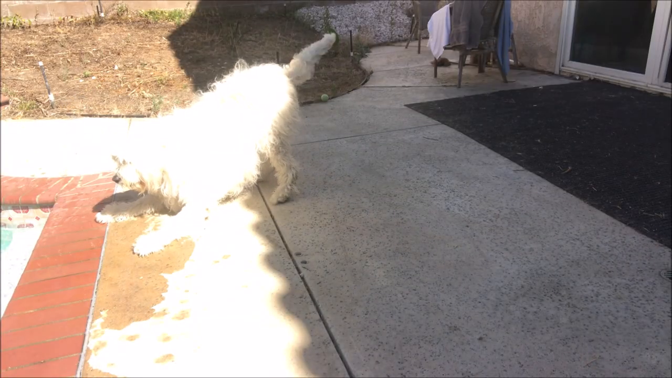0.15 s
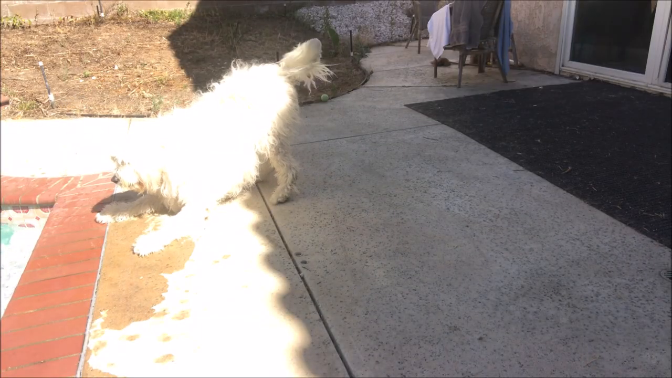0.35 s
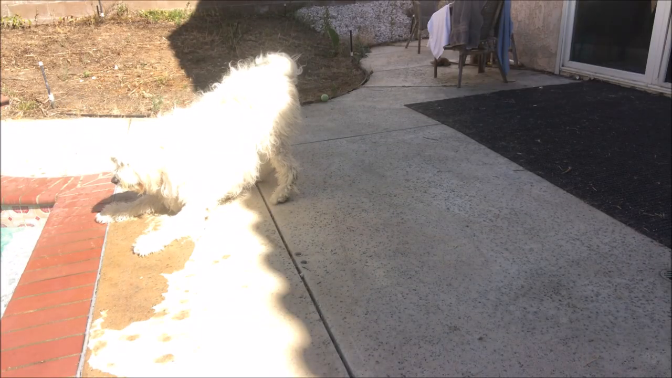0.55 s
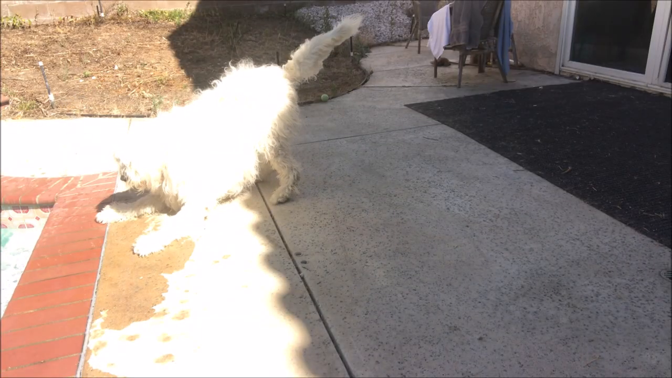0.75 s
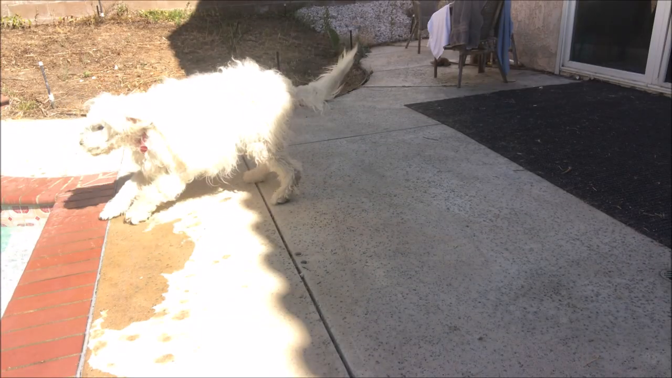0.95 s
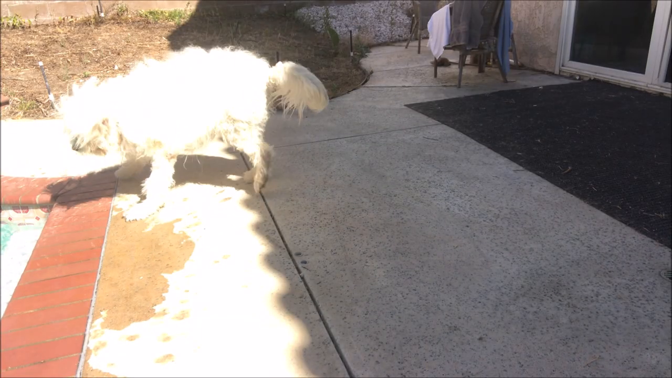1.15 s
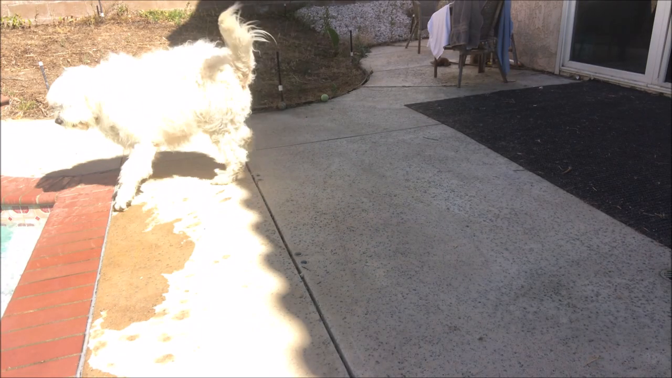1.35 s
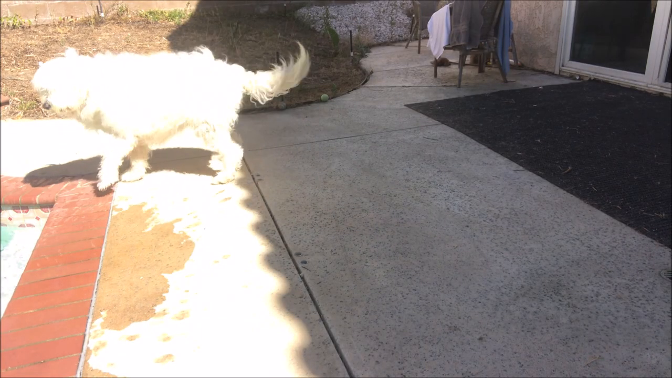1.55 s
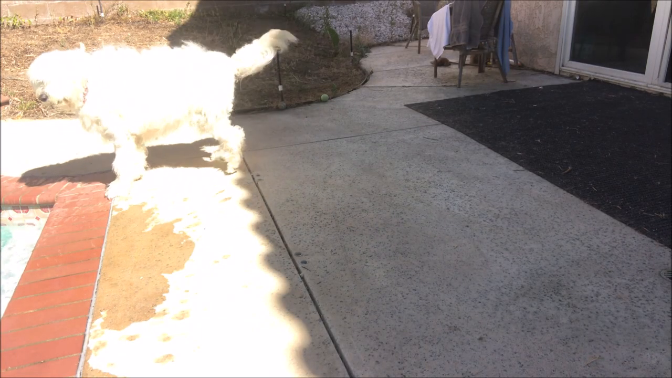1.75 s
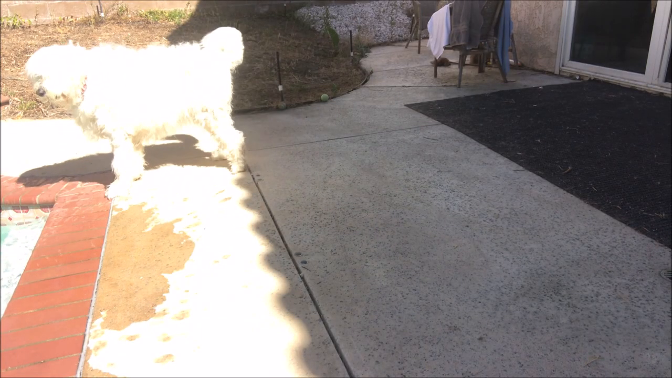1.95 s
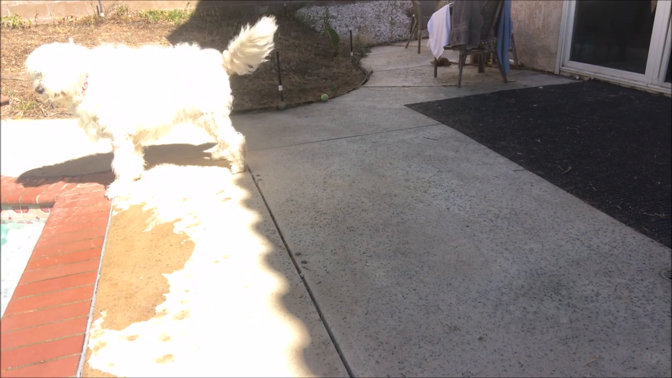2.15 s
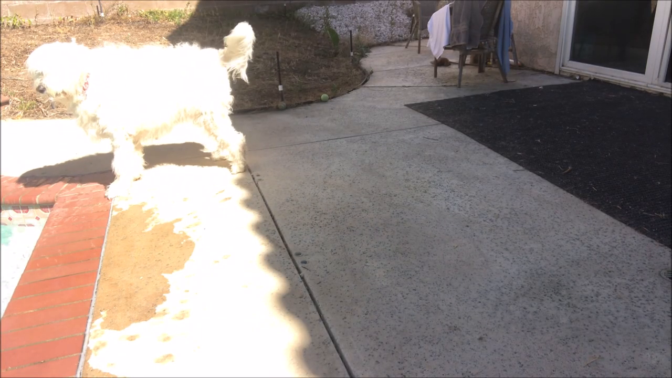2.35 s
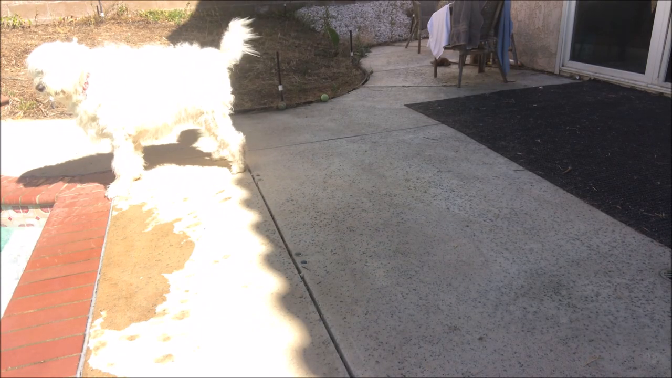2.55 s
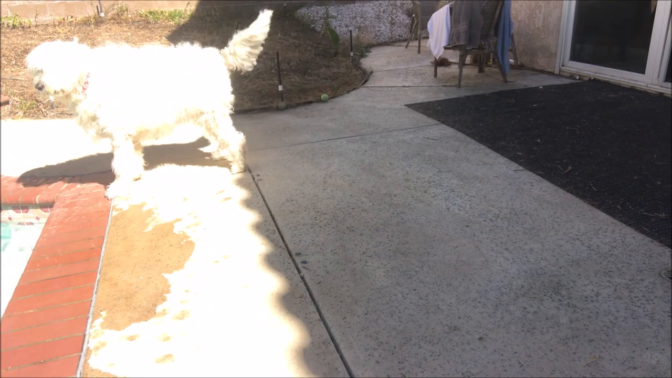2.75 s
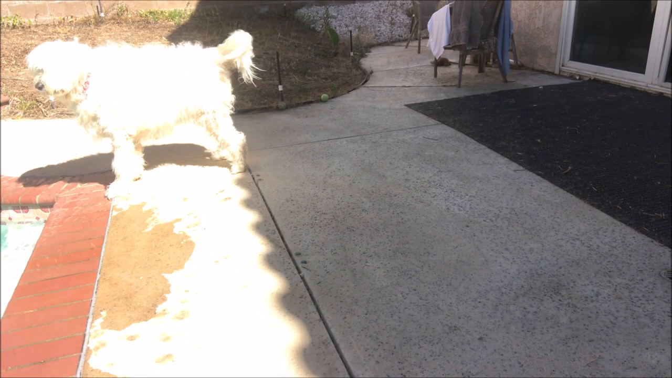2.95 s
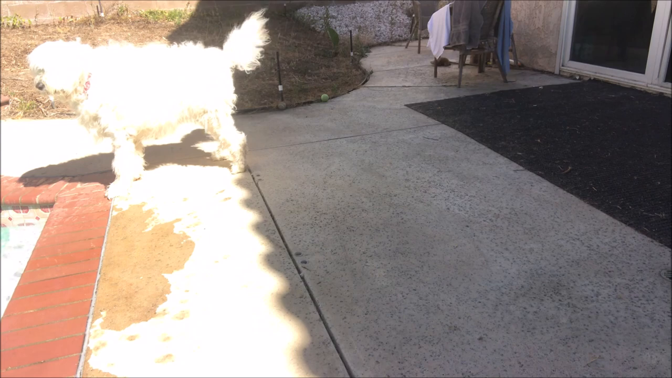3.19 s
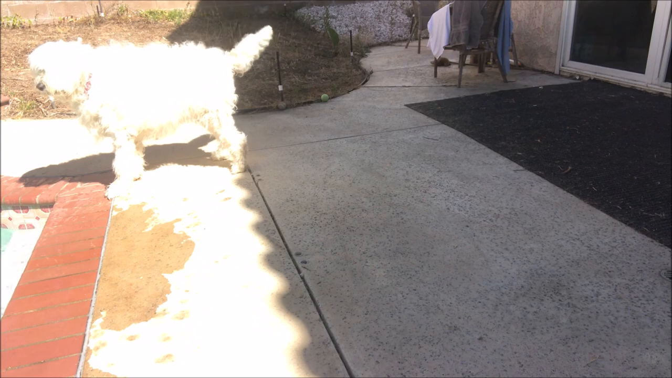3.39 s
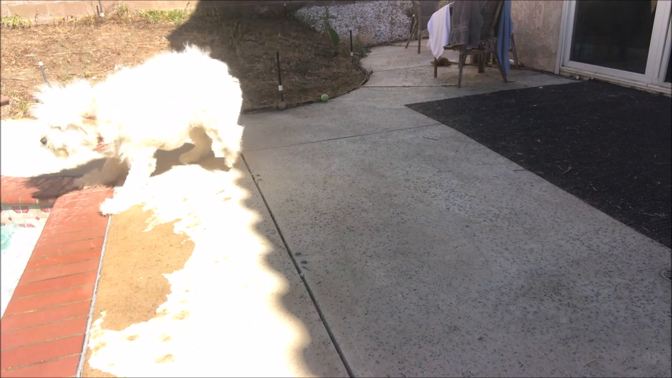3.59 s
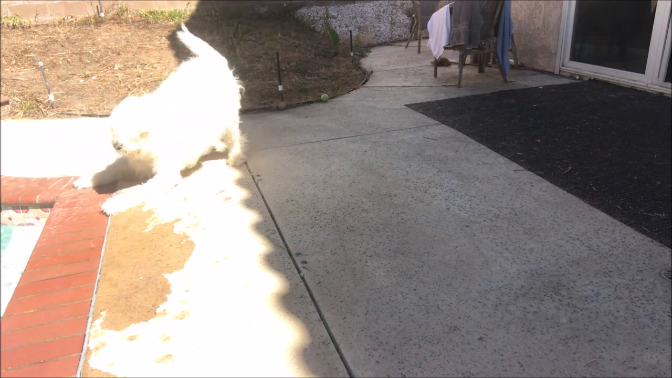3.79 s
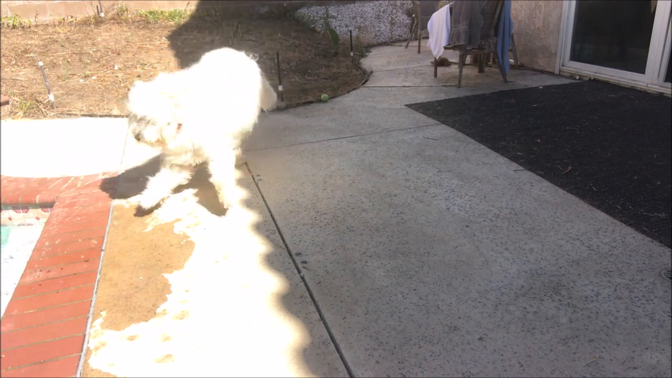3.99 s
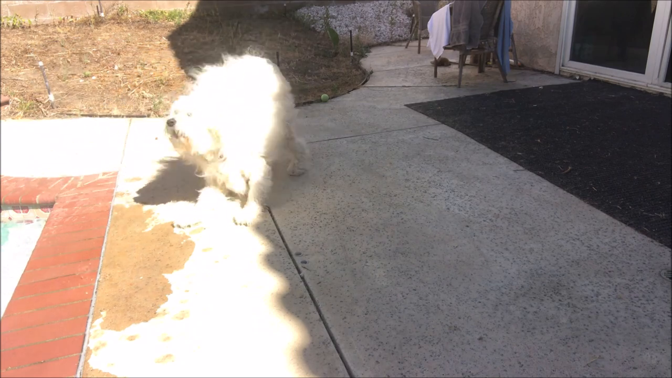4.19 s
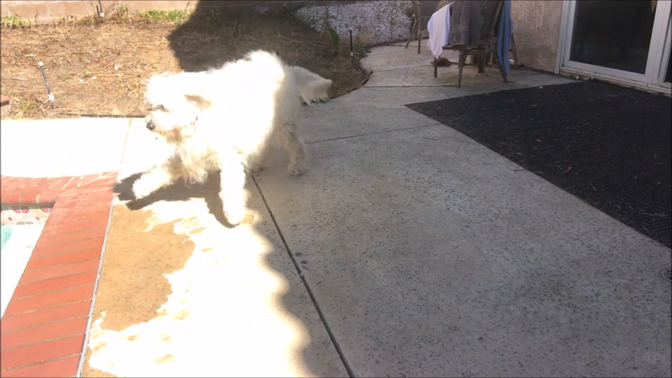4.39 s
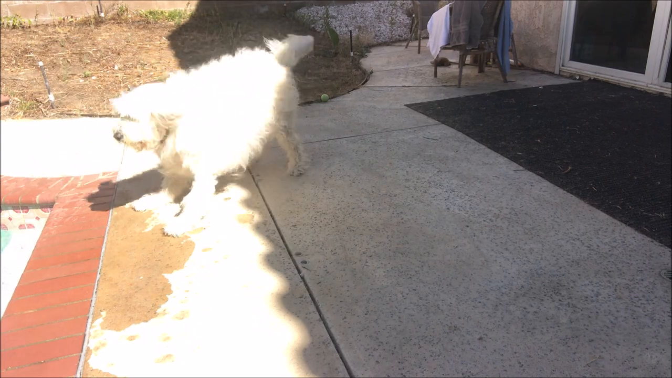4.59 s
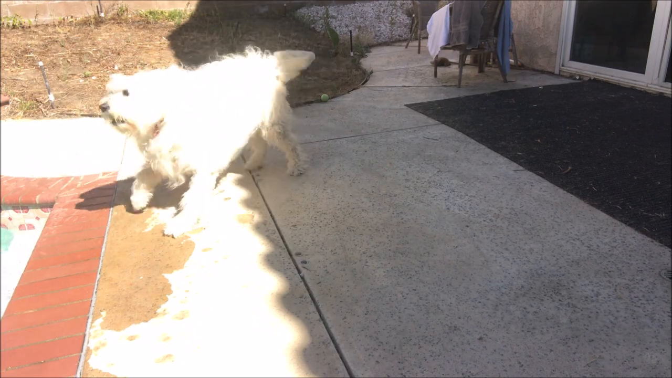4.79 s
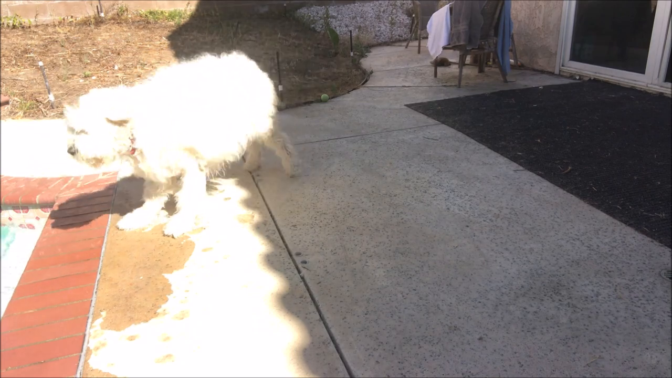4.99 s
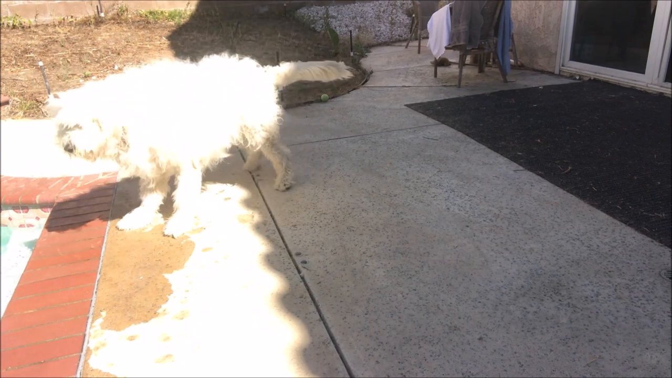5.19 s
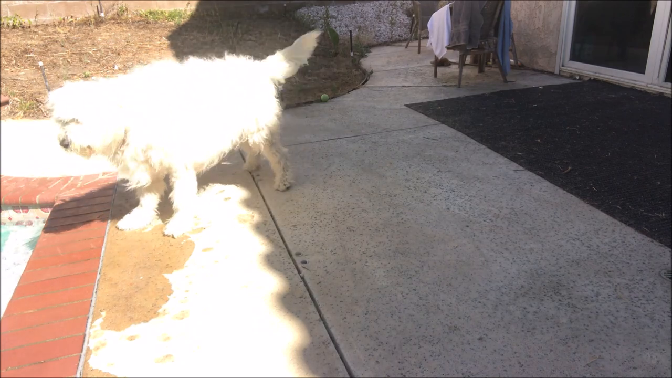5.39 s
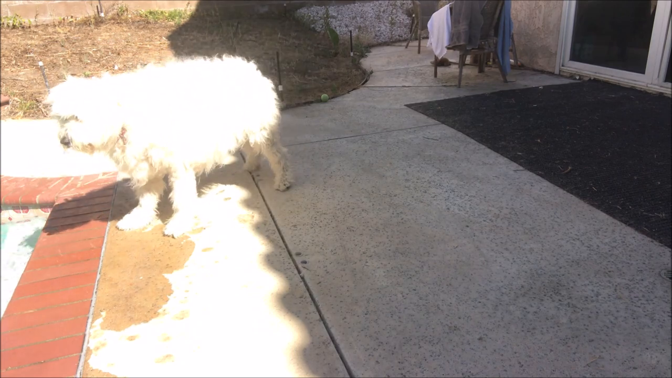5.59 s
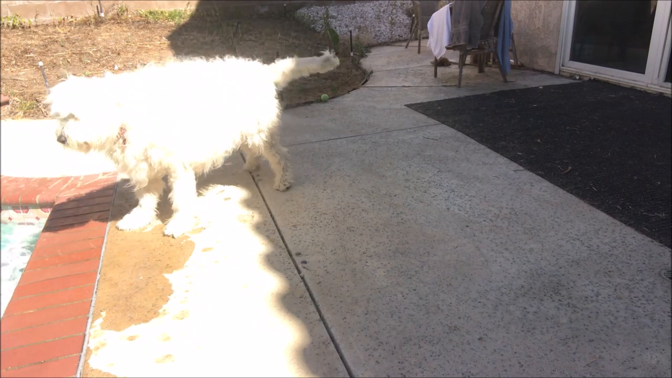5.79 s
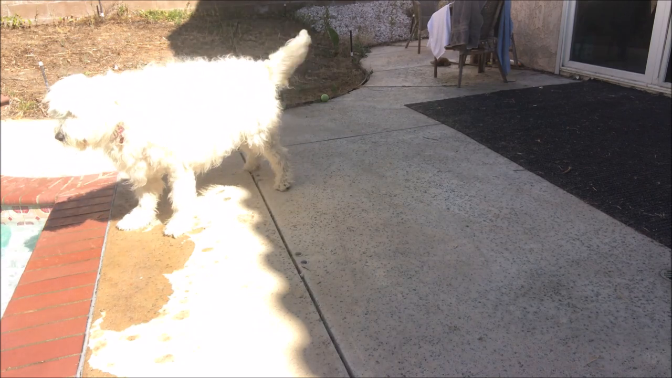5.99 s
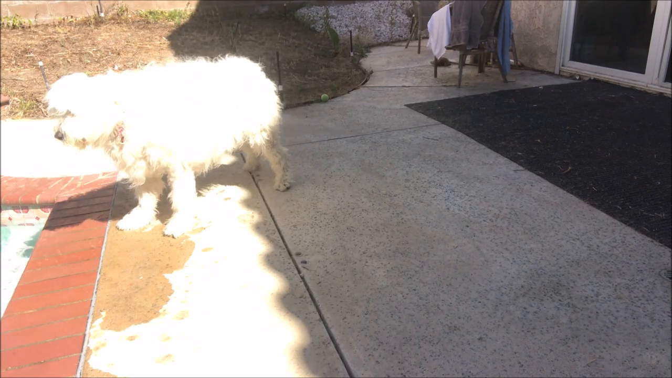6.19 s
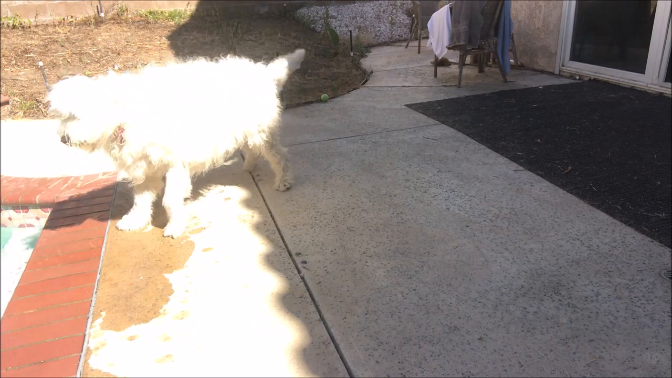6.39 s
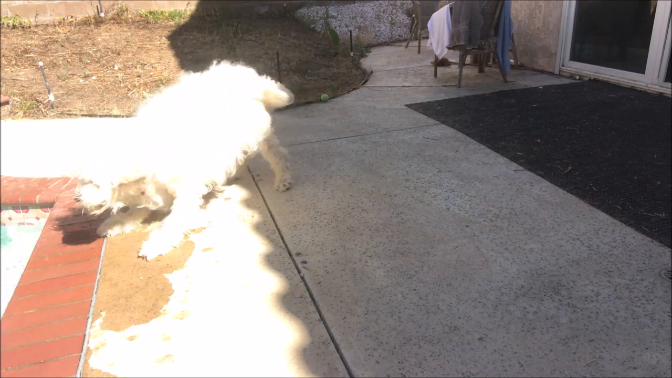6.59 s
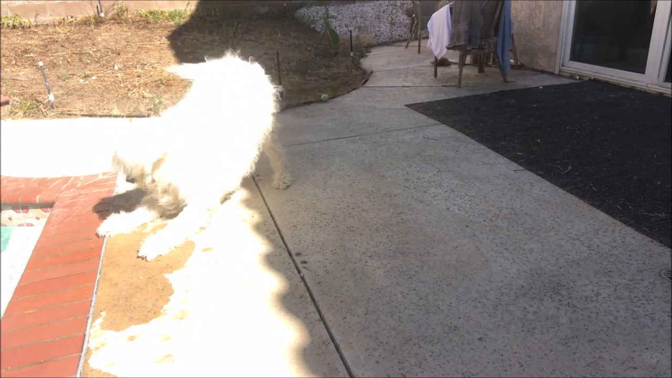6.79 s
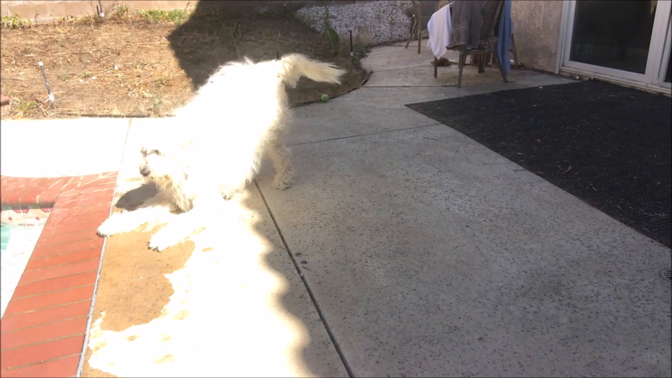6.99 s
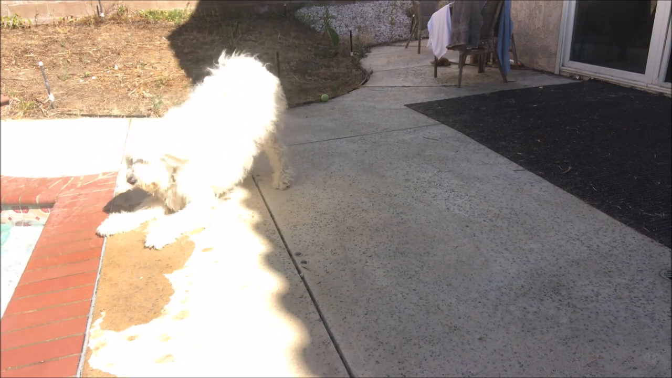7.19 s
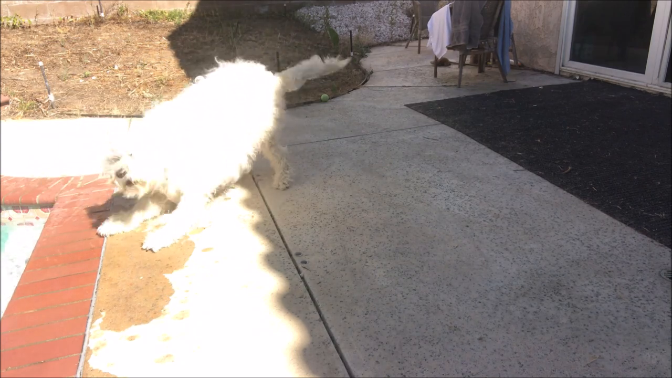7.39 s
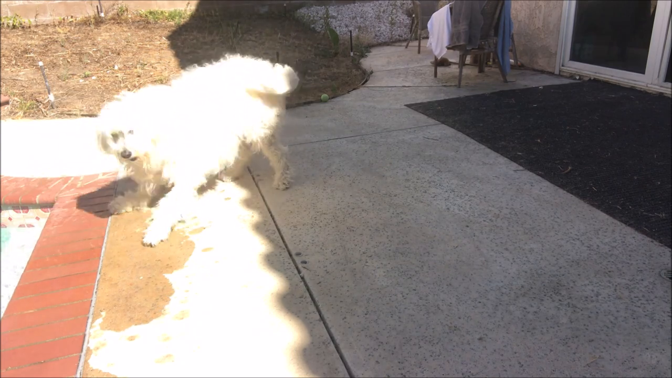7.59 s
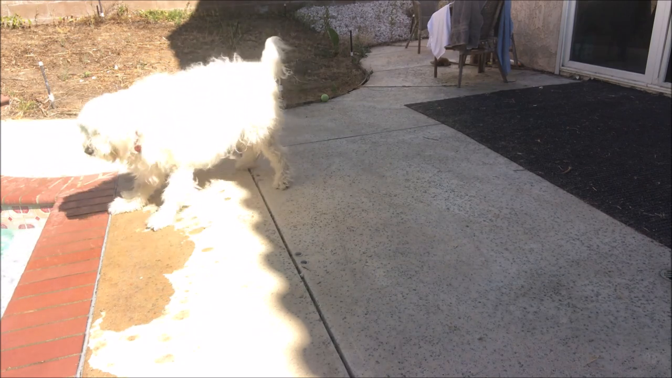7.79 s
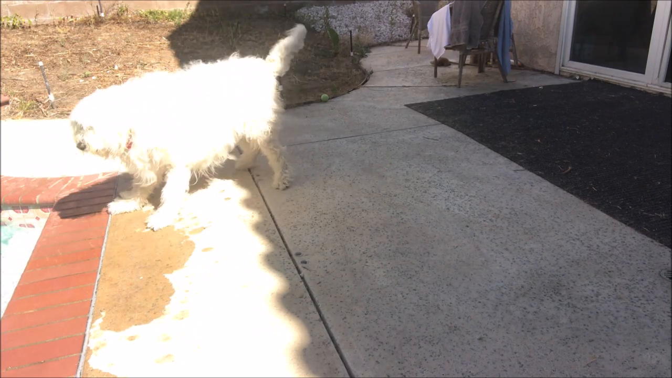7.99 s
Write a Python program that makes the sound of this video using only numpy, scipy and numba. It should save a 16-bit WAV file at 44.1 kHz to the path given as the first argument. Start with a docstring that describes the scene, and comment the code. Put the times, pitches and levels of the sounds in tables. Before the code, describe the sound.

Pool water laps and drips softly in a yard, over faint neighbourhood noise. A paw scrapes lightly at 0.4 seconds. At about 1 second a large dog gives one loud, rough bark close to the microphone, followed by a quiet, fluttering snort from 1.5 to 1.8 seconds. After a lull, three barks come at 3.6, 4.3 and 4.9 seconds, each breaking briefly into a yelp. The water sloshes hardest around 4 to 5 seconds, with a sharp drip at 4.7, then settles. Two more yelping barks land at 6.6 and 7.4 seconds, with a soft, breathy snarl between them from 6.9 to 7.3. The water stirs again until the end at about 8 seconds. Claws tick faintly on concrete here and there. The barks are short and much louder than everything else, each with a quick, bright echo from the house wall and a faint tail.

```python
"""A large dog barks six times, close by, with a snort and a snarl in between, beside a lapping pool.
Each bark is the rough buzz of vocal folds ringing in a closing mouth; five break into a clear yelp.
The snort and the snarl are fluttering puffs of breath. The water is tiny ringing bubbles, spray and drips.
Claws tick and a paw scrapes. The house wall and the yard echo, over faint neighbourhood noise."""
import sys
import numpy as np
from scipy import signal
from scipy.fft import rfft, irfft, next_fast_len
from scipy.io import wavfile
from scipy.ndimage import uniform_filter1d, map_coordinates
from numba import njit

SR = 44100
rng = np.random.default_rng(int(sys.argv[2]) if len(sys.argv) > 2 else 0)


def materialize(psi):
    """Save the field psi as 16-bit PCM at rate SR to the path in sys.argv[1].

    A 1-D psi becomes a single channel; in a 2-D psi each row is a channel.
    """
    bounded = np.clip(np.atleast_2d(psi).T, -1, 1)
    quanta = np.round(bounded * 32767).astype(np.int16)
    wavfile.write(sys.argv[1], SR, quanta)


N = 354999


def barks():
    """Six barks. Returns the sound heard directly and the sound sent towards the house wall."""
    # Each row: start, then rise time, hold time, time of the top pitch and time the mouth is half shut,
    # all in seconds; top pitch in Hz; roughness from 0 to 1; open-mouth resonances 1 and 2 in Hz;
    # relative levels in dB of woof, chest, resonances 1 to 3 and rasp; open-mouth resonance 3 in Hz;
    # pitch scoop in seconds; clearing at the top pitch from 0 to 1; grumble and wall echo levels in dB.
    bark_rows = [(.974, .038, 0.098, .1, 0.052, 386.6, 0.8, 940, 1394, -15.5, -18, -9.5, -24, -23, -10, 2340, .02, .05, -67, -8.5),
                 (3.631, 0.04, 0.1, 0.11, 0.087, 397.2, 0.5, 950, 1342, -56, -12.5, -14, -16.5, -25.5, -4.5, 2276, .024, 0.7, -40.5, -5.5),
                 (4.255, .044, 0.11, .115, 0.067, 391.3, .42, 979, 1519, -24, -13.5, -10.5, -18.5, -15.5, -3.5, 2254, .03, .05, -42.5, -19.5),
                 (4.86, .054, 0.13, .125, .115, 397, .7, 760, 1558, -21, -15, -9, -18, -26, -5, 2338, .046, .85, -35.5, -16.5),
                 (6.556, 0.037, 0.11, .118, .06, 402.8, .35, 908, 1615, -40, -13.5, -9.5, -21, -18.5, -5, 1970, .016, 0.4, -41, -12),
                 (7.367, .052, 0.12, .12, 0.062, 415, .35, 930, 1665, -15.5, -12, -15.5, -16, -21.5, -3.5, 2000, .034, 0.5, -58, -7.5)]
    direct, towards_wall = np.zeros(N), np.zeros(N)
    for start, *shape, grumble_db, wall_db in bark_rows:
        voice = bark(start, shape)
        add(direct, start, voice)
        add(direct, *grumble(start, grumble_db))
        add(towards_wall, start, amp(wall_db) * voice)
    return direct, towards_wall


def bark(start, shape, closing_s=.0093, release_db_per_s=440):
    """Buzzing vocal folds and rushing air make the chest, the closing mouth and the muzzle ring."""
    (attack, hold, crest, half_shut, crest_hz, roughness, open1, open2,
     woof_db, chest_db, db1, db2, db3, rasp_db, open3, scoop, clearing) = shape
    n = SR // 4
    age = np.arange(n) / SR
    # The effort rises from 26 dB below full force, holds, then dies away.
    onset = amp(-26 * np.maximum(1 - age / attack, 0) ** 1.2) * (1 - np.exp(-age / .002))
    released = np.maximum(age - hold, 0)
    effort = onset * amp(-release_db_per_s * released)
    # Closing the jaw moves the three mouth resonances and changes their strength.
    shut = (1 + np.tanh((age - half_shut) / (2 * closing_s))) / 2
    shut_hz, shut_change_db = (842, 1183.5, 1744), (-1.5, 6.5, -12)
    hz1, hz2, hz3 = [hz + (end - hz) * shut for hz, end in zip((open1, open2, open3), shut_hz)]
    gain1, gain2, gain3 = [effort * amp(db + change * shut)
                           for db, change in zip((db1, db2, db3), shut_change_db)]
    lips_rounded = (1 + np.tanh((age - crest - .024) / .0089)) / 2
    hz2 = hz2 * (1 - .2 * lips_rounded)
    pitch = bark_pitch(age, scoop, crest, crest_hz)
    # The voice is rough at low effort and clears around the top pitch.
    rough = np.clip((.8 + (roughness - .8) * effort) * (1 - clearing * bell(age, crest, .027)), 0, 1)
    phase, folds, breath = vocal_folds(pitch, rough)
    source = (1 - rough) * folds + rough * breath
    chest_gain = onset ** .6 * amp(chest_db - 1.5 * (2 - shut) - 268.5 * released)  # fades more slowly
    body = chest_gain * chest(pitch, phase, breath, rough, effort)
    mouth = gain1 * formant(source, hz1, width_hz=380) + gain2 * formant(source, hz2, width_hz=200)
    mouth += gain3 * formant(source + 1.5 * breath, hz3, width_hz=330)
    mouth += amp(-20.5) * gain2 * formant(source, np.full(n, 2317), width_hz=260)  # the palate stays put
    # The rasp grows with force, comes in ragged bursts and is muffled by the closing mouth.
    force = (gain1 + gain2 + 2 * gain3) ** (2 / 3)
    rasp = force * muzzle_rasp(folds, breath, hz2)
    rasp *= amp(rasp_db - 2.5 * shut + 3 * wobble(70, n))
    tone, dip = yelp(start + age, pitch, phase)
    return dip * (body + mouth) + amp(woof_db) * woof(source, age) + tone + rasp * dip ** .25


def bark_pitch(age, scoop, crest, crest_hz, growl_hz=217.37, climb_hz_per_s=700, sag_hz=87):
    """The wavering pitch scoops out of a growl, climbs to a crest and sags as the breath runs out."""
    climb = climb_hz_per_s * np.maximum(crest - age, 0)
    sag = sag_hz * (1 - bell(np.maximum(age, crest), crest, .025))
    arch = crest_hz - climb - sag
    pitch = arch + (growl_hz - arch) * np.exp(-(age / scoop) ** 1.4)
    return pitch * (1 + .02 * wobble(45, len(age)))


def vocal_folds(pitch, rough, jitter=.08, doubling=.42):
    """The folds let air through once a cycle. Returns their phase, their buzz and the breath noise."""
    n = len(pitch)
    phase = 2 * np.pi * np.cumsum(pitch * (1 + jitter * rough * wobble(300, n))) / SR
    harmonics = np.arange(1, 25)[:, None]
    pulses = unit(np.cos(harmonics * phase).sum(axis=0))
    # Under strain the pulses vary in size and alternate strong and weak.
    size = 1 + rough * wobble(350, n) + doubling * np.tanh(rough / .41) * np.cos(phase / 2)
    breath = unit(rng.standard_normal(n) * (1 + .81 * np.cos(phase)))
    return phase, pulses * size, breath


def chest(pitch, phase, breath, rough, effort):
    """Air rumbles in the chest; the lowest tone rings fully once the pitch climbs out of the growl."""
    # Tone of the chest. Each row: frequency in Hz, relative level in dB.
    chest_colour = [(40, -39), (110, -20.5), (190, -7.5), (250, -13.5), (320, 1.5), (420, 4.5), (560, -2),
                    (800, 1.5), (1500, -59.5)]
    ringing = np.clip((pitch - 270) / 80, .12, 1)
    rumble = 1.01 * rough * (1 - .36 * effort) * coloured(breath, chest_colour)
    return steady(ringing * np.sin(phase) + rumble)


def woof(source, age, peak_s=.031, rise_hz_per_s=4000):
    """A low resonance sweeps upward as the lips part."""
    hz = 460 + rise_hz_per_s * (age - peak_s)
    return bell(age, peak_s, .022) * formant(source, hz, width_hz=150)


def muzzle_rasp(folds, breath, mouth_hz):
    """High resonances of the muzzle sink as the mouth closes, over a hiss of rushing air."""
    # Muzzle resonances. Each row: resting frequency in Hz, width in Hz, relative level in dB.
    resonances = [(2950, 250, 0.5), (3695, 190, 5), (4340, 180, 2), (5240, 96, 3.5), (5980, 260, 4),
                  (6530, 550, -1.5), (8340, 400, -11)]
    # Tone of the hiss. Each row: frequency in Hz, relative level in dB.
    hiss_colour = [(2500, -33.5), (4000, -4), (7000, 5.5), (9000, -3), (10300, -8), (12000, -1),
                   (15500, -9.5)]
    n = len(folds)
    opening = (mouth_hz / 1300) ** .27
    rasp = np.zeros(n)
    for hz, width_hz, db in resonances:
        glide = hz * opening * (1 + .04 * wobble(90, n))
        rasp += amp(db + 4 * wobble(70, n)) * formant(breath / 2 + folds, glide, width_hz, order=2)
    return amp(-26) * unit(rasp) + amp(-40) * coloured(breath, hiss_colour)


def yelp(t, pitch, phase):
    """One clear overtone takes over. Returns it and the gain left for the rest of the voice."""
    # Each row: time in seconds, rough half length in seconds, frequency in Hz (the nearest overtone
    # sounds), level in dB, dip of the rest of the voice in dB.
    yelps = [(3.714, 0.013, 1180, -28, -2), (4.363, 0.007, 1190, -8, -10.5),
             (4.985, 0.018, 780, -5.5, -6.5), (6.679, .009, 1200, -9.5, -25),
             (7.495, 0.01, 1230, -10.5, -26)]
    tone, rest_db = np.zeros(len(t)), np.zeros(len(t))
    for s, length, hz, db, dip_db in yelps:
        if t[0] < s < t[-1]:
            harmonic = round(hz / np.interp(s, t, pitch))
            tone += amp(db) * bell(t, s, 1.2 * length) * unit(np.sin(harmonic * phase))
            rest_db += dip_db * bell(t, s - .003, length)
    return tone, amp(rest_db)


def grumble(start, level_db, rate_hz=150):
    """The slack folds flap a few times before the voice catches. Returns start time and sound."""
    # Tone of the flapping. Each row: frequency in Hz, relative level in dB.
    colour = [(60, -10), (170, 1), (450, -4.5), (900, -10), (2000, -32.5), (5000, -48.5)]
    t = np.arange(SR // 10) / SR
    flaps = rng.standard_normal(len(t)) * np.exp(-2 * (rate_hz * t % 1))
    return start - t.mean(), amp(level_db) * bell(t, t.mean(), .022) * coloured(flaps, colour)


def snort():
    """Fast puffs of breath ring in the nose."""
    # Each row: time in seconds, breath level in dB, throat thump level in dB.
    levels = [(1.535, -50.5, -60.5), (1.567, -39, -45), (1.631, -34.5, -51.5), (1.677, -37.5, -55),
              (1.711, -42.5, -53.5), (1.765, -42, -58.5), (1.81, -59, -56)]
    # Resonances of the nose. Each row: frequency in Hz, width in Hz, relative level in dB.
    nose = [(948, 160, 7), (1160, 300, 7), (2310, 210, -3), (3140, 420, -16.5), (4660, 700, -26.5),
            (5100, 580, -29), (7540, 520, -40.5)]
    return flutter(levels, nose, rate_hz=95, scatter=.12, depth=1.6)


def snarl():
    """Slower, more uneven puffs ring behind bared teeth."""
    # Each row: time in seconds, breath level in dB, throat thump level in dB.
    levels = [(6.88, -60.5, -58.5), (6.898, -41.5, -35), (6.916, -41.5, -36.5), (6.996, -46.5, -45),
              (7.074, -42.5, -43.5), (7.14, -47, -54.5), (7.214, -46, -42.5), (7.246, -45, -47.5),
              (7.28, -59.5, -59.5)]
    # Resonances of the mouth. Each row: frequency in Hz, width in Hz, relative level in dB.
    bared_teeth = [(1540, 490, 4), (1990, 560, 0.5), (3070, 250, -5.5), (4540, 240, -1.5),
                   (6340, 1500, -13)]
    return flutter(levels, bared_teeth, rate_hz=70, scatter=.35, depth=1.2)


def flutter(levels, resonances, rate_hz, scatter, depth, rise_s=.00061, fall_s=.01):
    """The flapping soft palate chops air into puffs that ring. Returns start time and sound."""
    # Tone of the throat thump. Each row: frequency in Hz, relative level in dB.
    throat_colour = [(40, -10.5), (100, 7), (170, 6), (260, 5), (400, 5), (620, -1), (900, -38),
                     (2000, -49)]

    def airway(hz):
        """The resonances added together, with the highest treble softened."""
        peaks = sum((-1) ** k * amp(db) * 1j * hz * width / (centre ** 2 - hz ** 2 + 1j * hz * width)
                    for k, (centre, width, db) in enumerate(resonances))
        return peaks / (1 + (hz / 7500) ** 2)

    times, breath_db, thump_db = np.transpose(levels)
    first, last = times[0], times[-1]
    t = np.arange(int((first - .03) * SR), int((last + .06) * SR)) / SR
    fade = np.exp(np.minimum(t - first, 0) / rise_s) * np.exp(np.minimum(last - t, 0) / fall_s)
    cycle = np.cumsum(rate_hz * (1 + scatter * wobble(60, len(t)))) / SR % 1
    puffs = rng.standard_normal(len(t)) * np.exp(-depth * cycle)
    breath = amp(np.interp(t, times, breath_db)) * unit(filtered(puffs, airway))
    thump = amp(np.interp(t, times, thump_db)) * coloured(puffs, throat_colour)
    return t[0], fade * (breath + thump)


def water():
    """Trickling bubbles merge into a wash of spray as the pool is stirred harder, over deep churning."""
    # Tone of the spray. Each row: frequency in Hz, relative level in dB.
    spray_colour = [(300, -8), (700, 4.5), (1300, 6.5), (2200, 1), (3500, -3), (6000, -6), (9000, -14.5),
                    (15000, -19.5)]
    # Tone of the churning. Each row: frequency in Hz, relative level in dB.
    churn_colour = [(30, -23.5), (70, -3), (140, 0.5), (400, 4), (800, 2.5), (1300, -18), (3000, -33.5)]
    spray_db, churn_db = sloshes()
    trickle = bubbles(2700, spread=.6, cycles=7, range_db=7, count=2600, samples=700)
    trickle += .083 * bubbles(7600, spread=.21, cycles=3, range_db=10, count=900, samples=120)
    wash = coloured(rng.standard_normal(N) * amp(3.1 * wobble(370, N)), spray_colour)
    merged = np.clip((spray_db + 50) / 12, 0, .85)
    stirred = np.clip((spray_db + 64.5) / 12, 0, 1)  # nearly still water hardly bubbles
    spray = stirred * np.sqrt(1 - merged) * trickle + amp(-3) * (1.75 + merged) * wash
    gurgle = bubbles(450, spread=.7, cycles=6.6, range_db=.88, count=1200, samples=2500)
    churn = coloured(gurgle + 2 * rng.standard_normal(N), churn_colour)
    lapping_db = 1.6 * wobble(22, N)
    return amp(spray_db + lapping_db) * spray + amp(churn_db) * churn


def sloshes(calm_spray_db=-76.5, calm_churn_db=-69):
    """Each slosh swells and settles, and their powers add. Returns spray and churn levels in dB."""
    # Each row: peak time in seconds, spray and churn levels in dB, swell and settle times in seconds.
    slosh_rows = [(.02, -55.5, -56, 0.032, 0.38), (0.352, -52.5, -61, 0.083, 1),
                  (.62, -53.5, -52.5, .1, 0.8), (1.25, -66.5, -49.5, 0.32, 0.19),
                  (2.23, -59.5, -61, 0.054, 0.081), (3.7, -44.5, -51.5, .03, 0.29),
                  (4.14, -38.5, -34.5, 0.21, 0.33), (4.619, -45.5, -48, 0.063, 0.25),
                  (4.8, -50.5, -44.5, 0.0472, 0.5), (5.42, -60.5, -66, 0.22, 0.63),
                  (6.05, -67.5, -68, 0.18, 0.57), (6.6, -57.5, -57.5, .09, 1),
                  (7.6, -54, -52.5, 0.027, 0.23), (7.82, -54.5, -59, 0.0927, 0.049),
                  (8.05, -48, -62.5, 0.0225, .1)]
    t = np.arange(N) / SR
    spray, churn = amp(calm_spray_db) ** 2, amp(calm_churn_db) ** 2
    for s, spray_db, churn_db, swell, settle in slosh_rows:
        rise = bell(np.minimum(t, s), s, swell)
        spent = np.maximum(t - s, 0) / settle
        spray += (amp(spray_db) * rise * np.exp(-spent)) ** 2
        churn += (amp(churn_db) * rise * np.exp(-3.1 * spent)) ** 2  # churning settles faster
    return 10 * np.log10([spray, churn])


def bubbles(centre_hz, spread, cycles, range_db, count, samples):
    """A crowd of small bubbles, each a short rising ring with a soft start."""
    starts = rng.integers(0, N, count)
    pitch, loudness = rng.standard_normal((2, count))
    hz = np.clip(centre_hz * np.exp(spread * pitch), 60, 14000)[:, None]
    age = hz * np.arange(samples) / SR / cycles  # reaches 1 when the ring has nearly died
    gain = amp(range_db * np.clip(loudness, -3, 2))[:, None]
    rings = gain * age * np.exp(-5 * age) * np.sin(2 * np.pi * cycles * age * (1 + .1 * age))
    positions = starts[:, None] + np.arange(samples)
    return unit(np.bincount(positions.ravel(), rings.ravel(), N + samples)[:N])


def drops():
    """Each drop lands with a tick and traps a bubble, whose ring rises an octave as it surfaces."""
    # Each row: start in seconds, ring level in dB, starting pitch in Hz, seconds to fade by 60 dB.
    drop_rows = [(.312, -34, 2700, 0.017), (0.772, -32, 4590, 0.0084), (.793, -33.5, 2890, .018),
                 (2.233, -44.5, 859, 0.13), (4.725, -13.5, 1650, 0.012), (5.535, -26.5, 660, 0.088),
                 (5.941, -42.5, 1750, 0.026), (6.053, -44.5, 2140, .04), (7.996, -24.5, 1420, .0092)]
    out, t = np.zeros(N), np.arange(SR // 10) / SR
    for s, db, hz, fade_s in drop_rows:
        glide = hz * 2 ** np.tanh(1.9 * t / fade_s)
        ring = np.sin(2 * np.pi * np.cumsum(glide) / SR) * amp(-60 * t / fade_s) * (1 - np.exp(-t / .0005))
        tick = .33 * rng.standard_normal(len(t)) * np.exp(-t / .00023)
        add(out, s, amp(db) * (ring + tick))
    return out


def claws(decay_s=.0018, level_db=-8):
    """Claws and drips hit the concrete with dry little ticks."""
    # Each row: start in seconds, relative level in dB.
    ticks = [(0.0972, -43), (0.5444, -32), (0.8834, -36), (1.307, -36), (1.7734, -37.5), (2.4628, -42.5),
             (3.5914, -44), (4.6334, -29.5), (4.7666, -25.5), (5.9922, -40.5), (7.1755, -34),
             (7.2404, -38.5), (7.3257, -41), (7.6485, -31), (7.83, -32.5)]
    # Tone of a tick on concrete. Each row: frequency in Hz, relative level in dB.
    concrete_colour = [(600, -12.5), (2000, -4), (4000, 2), (7000, -0.5), (11000, -11), (15500, -9.5)]
    out, t = np.zeros(N), np.arange(SR // 50) / SR
    for s, db in ticks:
        tick = coloured(rng.standard_normal(len(t)), concrete_colour) * np.exp(-t / decay_s)
        add(out, s, amp(db + level_db) * tick)
    return out


def scuff(peak_s=.39, level_db=-46.5):
    """A paw drags over the pool's edge with a soft, grainy scrape."""
    # Tone of the scrape. Each row: frequency in Hz, relative level in dB.
    scrape_colour = [(1500, -22.5), (3000, -3.5), (3900, 1), (5000, -18.5), (9000, -32.5)]
    grit = coloured(rng.standard_normal(N) * amp(4 * wobble(150, N)), scrape_colour)
    return amp(level_db) * bell(np.arange(N) / SR, peak_s, .045) * grit


def wall_echo(x, delay_s=.116, spread_s=.024):
    """The house wall throws back a short, bright slap."""
    # Tone of the echo. Each row: frequency in Hz, relative level in dB.
    wall_colour = [(200, -23.5), (900, -19), (1600, -7.5), (2100, -7.5), (3000, 5.5), (6000, -0.5),
                   (12000, 6)]
    t = np.arange(SR // 4) / SR
    fade = np.exp(-np.abs(t - delay_s) / spread_s) * (t > delay_s)
    slap = coloured(rng.standard_normal(len(t)) * fade, wall_colour)
    return signal.fftconvolve(x, slap / np.linalg.norm(slap))[:N]


def yard_echo(x, patio_db=-21, tail_db=-27, fence_db=-29, fence_s=.17):
    """Sound scatters quickly off the patio, bounces off the fence and leaves a faint long tail."""
    # How long the yard rings. Each row: frequency in Hz, seconds to fade by 60 dB.
    fade_times = [(150, 0.41), (400, 0.67), (1000, 0.76), (1700, 0.39), (5000, 0.23), (12000, 0.091)]
    # Tone of the fence echo. Each row: frequency in Hz, relative level in dB.
    fence_colour = [(500, -22.5), (1150, -14), (1700, 2), (2300, -7.5), (5000, 0)]
    hz, frame_s, bands = signal.stft(rng.standard_normal(SR), SR, nperseg=256)
    bands *= amp(-60 * frame_s / along(fade_times, hz)[:, None])
    t = np.arange(SR) / SR
    tail = signal.istft(bands, SR, nperseg=256)[1][:SR] * (1 - np.exp(-t / .004))
    patio = rng.standard_normal(SR) * amp(-60 * t / .11) * (t > .006)
    fence = coloured(rng.standard_normal(SR) * bell(t, fence_s, .036), fence_colour)
    parts = [(patio_db, patio), (tail_db, tail), (fence_db, fence)]
    response = sum(amp(db) * part / np.linalg.norm(part) for db, part in parts)
    return signal.fftconvolve(x, response)[:N]


def outdoor_air(level_db=-58):
    """Faint neighbourhood noise, and a few low puffs of air on the microphone."""
    # Tone of the distant neighbourhood. Each row: frequency in Hz, relative level in dB.
    distant_colour = [(15, -38), (25, -10), (48, -1.5), (119, -7), (209, -13), (240, -17.5), (389, -20),
                      (469, -34.5), (523, -10), (614, -22), (919, -22), (2700, -38), (15500, -50)]
    # Each row: peak time in seconds, level in dB, half length in seconds.
    puff_rows = [(2.064, -45, .025), (5.994, -47, .03), (6.405, -50.5, 0.045), (6.507, -41.5, 0.035)]
    t = np.arange(N) / SR
    puffs = sum(amp(db) * bell(t, s, length) for s, db, length in puff_rows)
    rumble = coloured(rng.standard_normal(N), [(20, 12), (55, 20), (110, 4), (250, -29), (600, -65)])
    distant = amp(level_db + .8 * wobble(8.2, N)) * coloured(rng.standard_normal(N), distant_colour)
    return distant + puffs * rumble


def formant(x, hz, width_hz, order=3):
    """A resonance of the throat or mouth: it favours one moving frequency, at an even output level."""
    angle, radius = 2 * np.pi * hz / SR, np.exp(-np.pi * abs(width_hz) / SR)
    for _ in range(order):
        x = resonate(x, angle, radius)
    return steady(x)


@njit
def resonate(x, angle, radius):
    """Make x ring: angle sets the pitch at each sample, radius how long it rings."""
    y = np.zeros(len(x))
    for i in range(2, len(x)):
        y[i] = x[i] - x[i - 2] + 2 * radius * np.cos(angle[i]) * y[i - 1] - radius * radius * y[i - 2]
    return y


def amp(db):
    """Turn decibels into a gain."""
    return 10 ** (np.asarray(db) / 20)


def unit(x):
    """Scale to an average power of 1."""
    return x / np.sqrt(np.mean(x ** 2) + 1e-20)


def steady(x):
    """Hold the power near 1 over every few voice cycles."""
    power = uniform_filter1d(uniform_filter1d(x ** 2, size=400), size=300)
    return x / np.sqrt(np.abs(power) + 1e-12)


def bell(t, centre, width):
    """A smooth bump of height 1."""
    return np.exp(-((t - centre) / width) ** 2)


def wobble(rate, n):
    """A smooth random curve through `rate` random values a second."""
    return map_coordinates(rng.standard_normal(int(n * rate / SR) + 4), [np.arange(n) * rate / SR])


def add(track, s, x):
    """Mix x into the track at s seconds."""
    part = track[max(int(s * SR), 0):][:len(x)]
    part += x[:len(part)]


def along(points, hz):
    """Read between (Hz, value) points, with octaves evenly spaced."""
    point_hz, values = np.transpose(points)
    return np.interp(np.log(hz + 1), np.log(point_hz + 1), values)


def filtered(x, response):
    """Scale each frequency in x by response(hz)."""
    size = next_fast_len(len(x) + 8192)
    return irfft(rfft(x, size) * response(np.fft.rfftfreq(size, 1 / SR)), size)[:len(x)]


def coloured(x, colour):
    """Shape the tone of x with (Hz, dB) points, at an average power of 1."""
    return unit(filtered(x, lambda hz: amp(along(colour, hz))))


def scene():
    """The dog and the pool in the yard."""
    dog, towards_wall = barks()
    add(dog, *snort())
    add(dog, *snarl())
    direct = dog + drops() + claws() + scuff()
    return (direct + yard_echo(direct) + wall_echo(towards_wall) + water() + outdoor_air())[None]


def record(dry, low_hz=30, top_hz=15850):
    """Round off the loudest peaks, fade out the deepest bass and cut the highest treble."""
    rounded = dry[0] / (1 + np.abs(dry[0]) ** 8) ** (1 / 8)
    return filtered(rounded, lambda hz: (hz < top_hz) * hz ** 4 / (hz ** 4 + low_hz ** 4))[None]


dry = scene()
out = record(dry)
materialize(out)
```